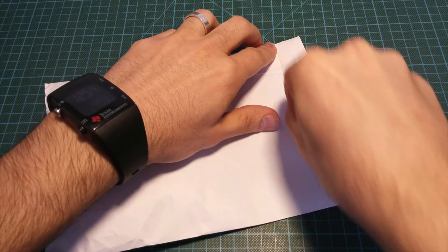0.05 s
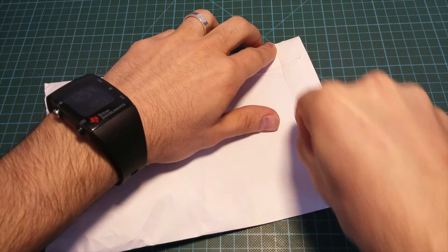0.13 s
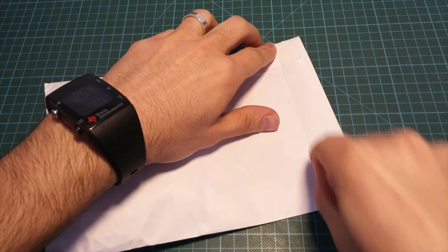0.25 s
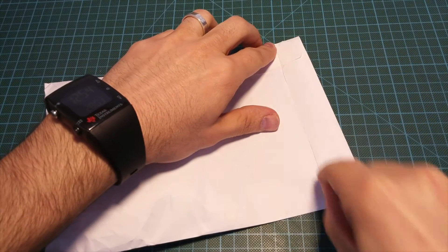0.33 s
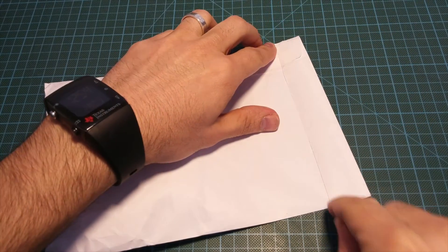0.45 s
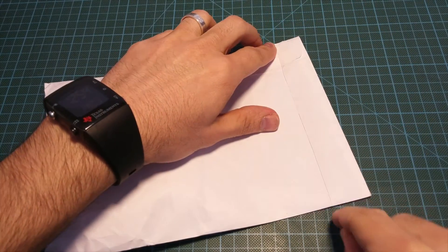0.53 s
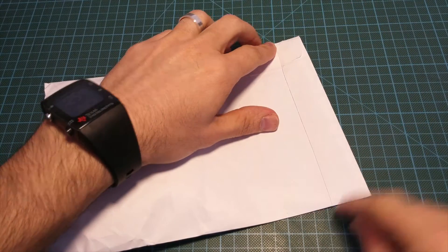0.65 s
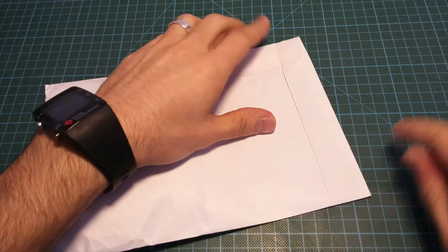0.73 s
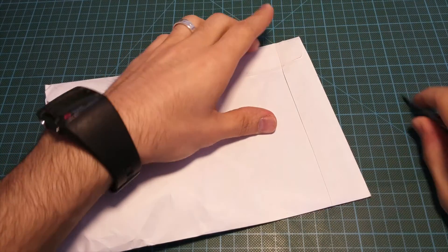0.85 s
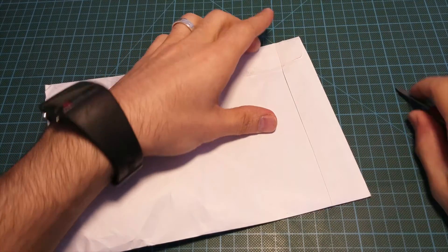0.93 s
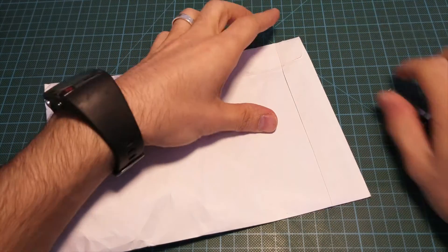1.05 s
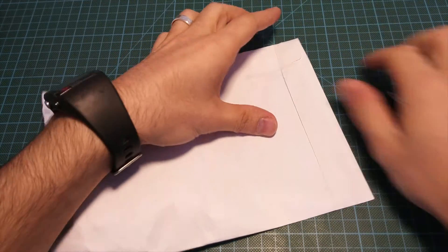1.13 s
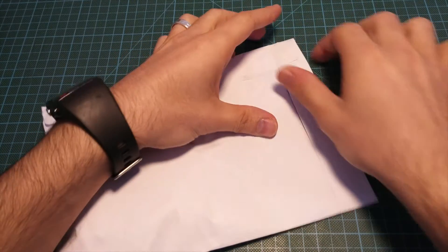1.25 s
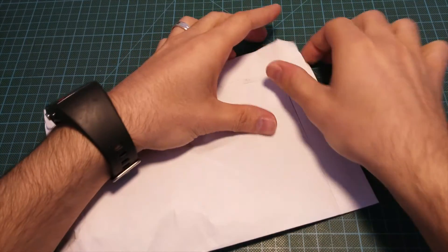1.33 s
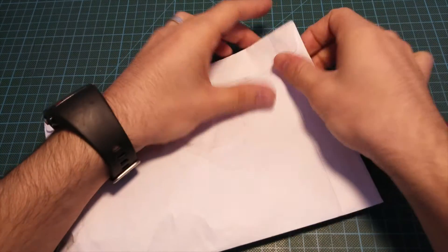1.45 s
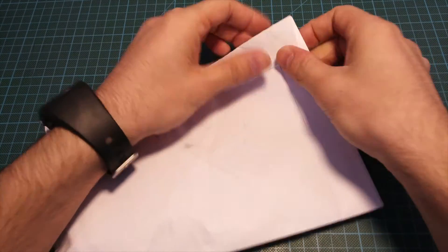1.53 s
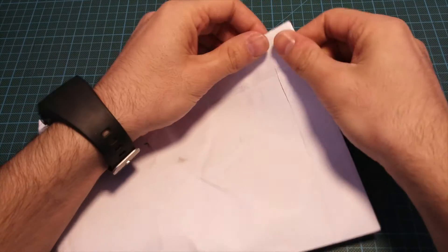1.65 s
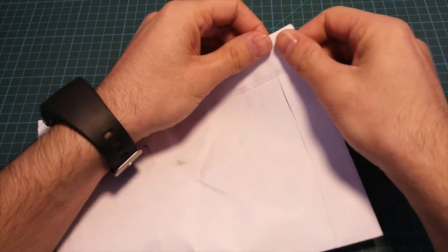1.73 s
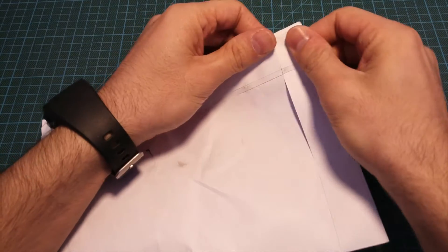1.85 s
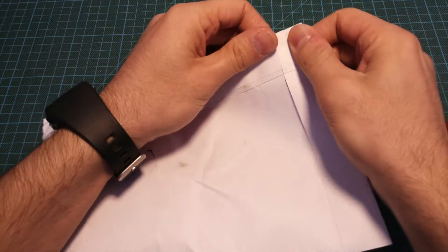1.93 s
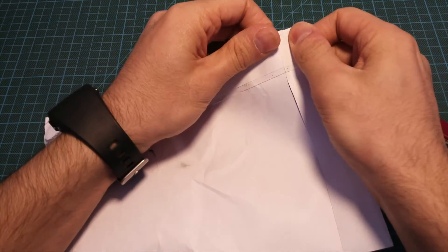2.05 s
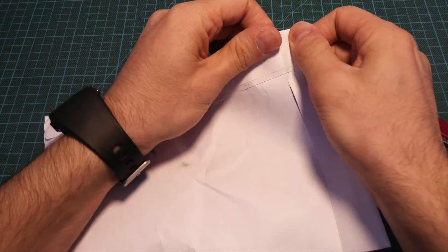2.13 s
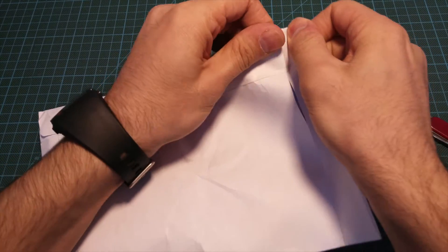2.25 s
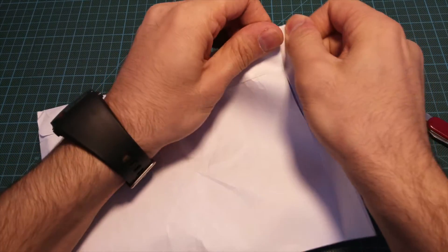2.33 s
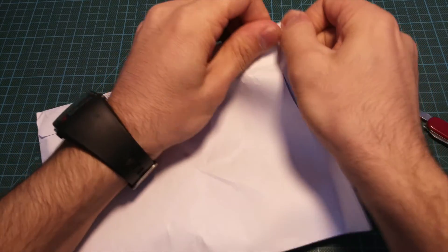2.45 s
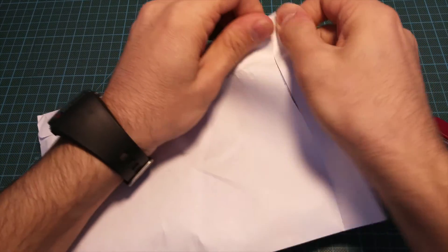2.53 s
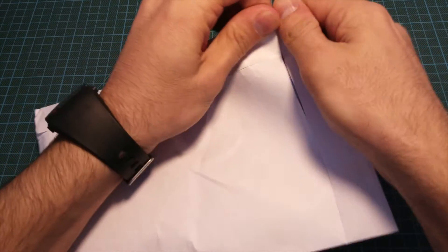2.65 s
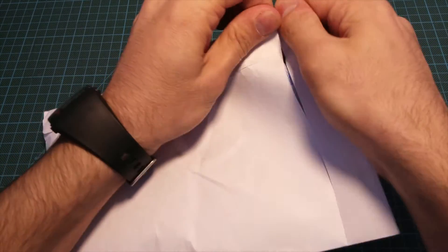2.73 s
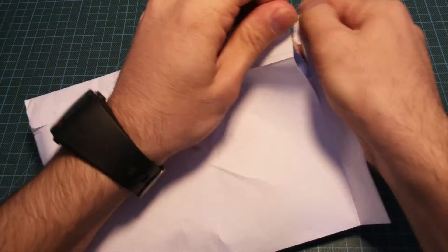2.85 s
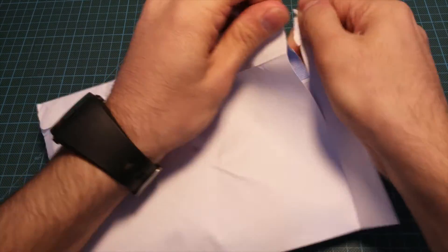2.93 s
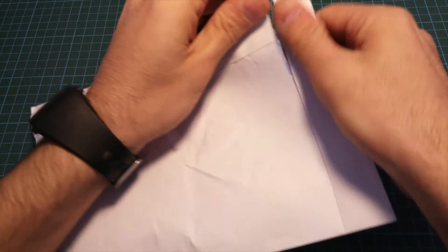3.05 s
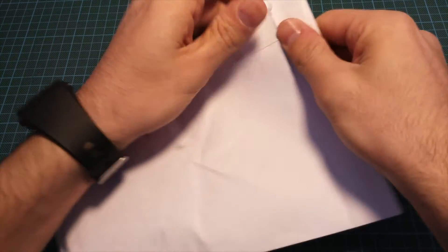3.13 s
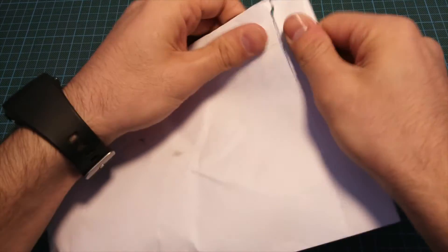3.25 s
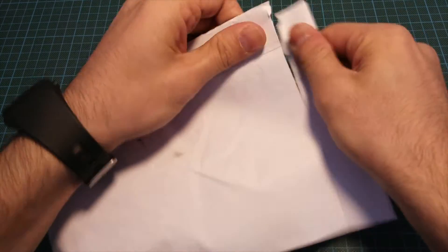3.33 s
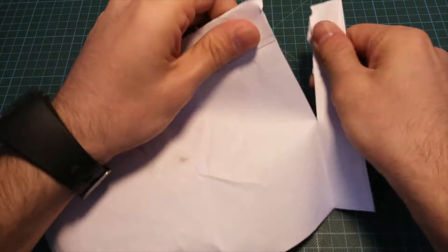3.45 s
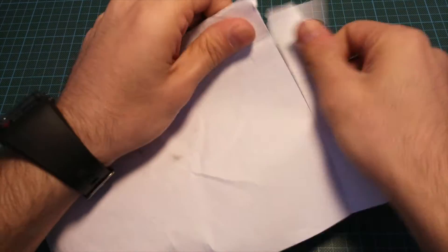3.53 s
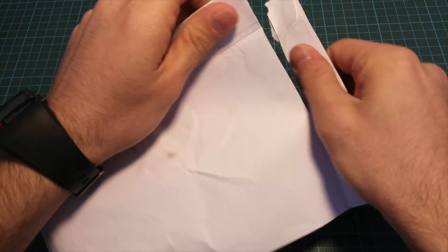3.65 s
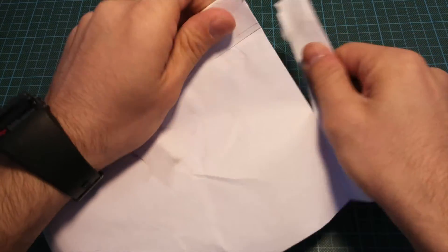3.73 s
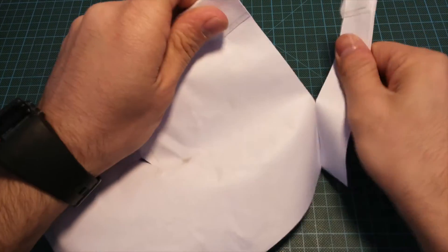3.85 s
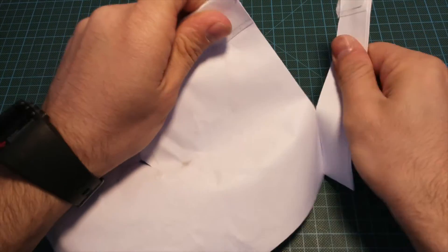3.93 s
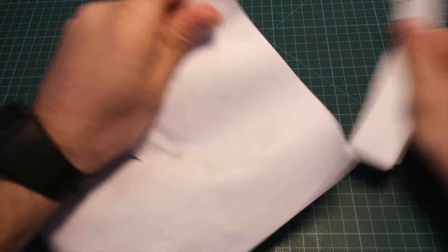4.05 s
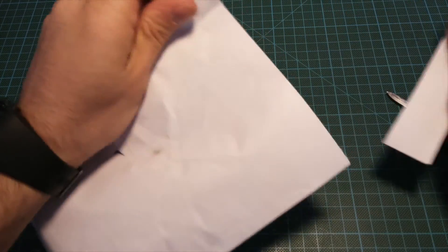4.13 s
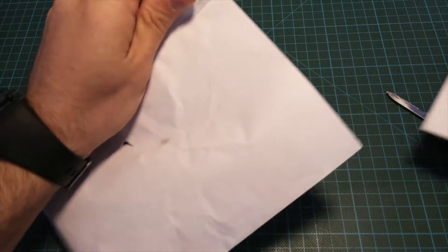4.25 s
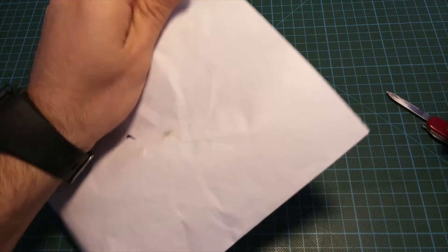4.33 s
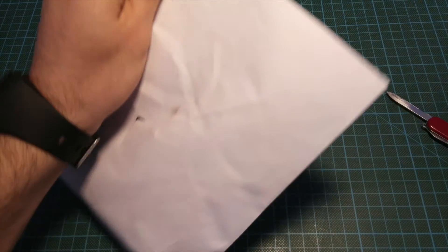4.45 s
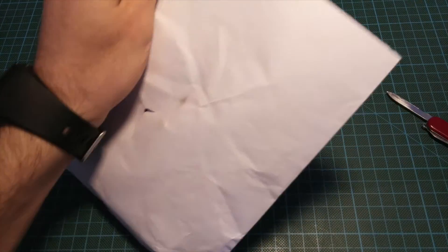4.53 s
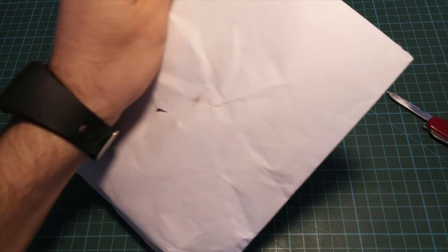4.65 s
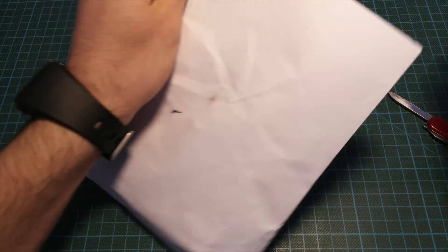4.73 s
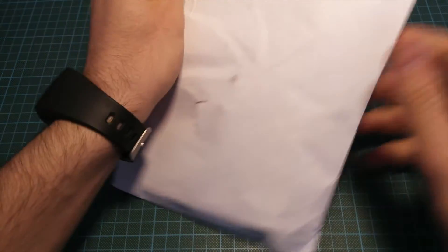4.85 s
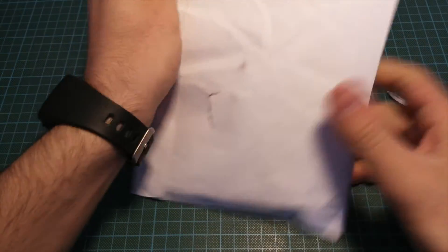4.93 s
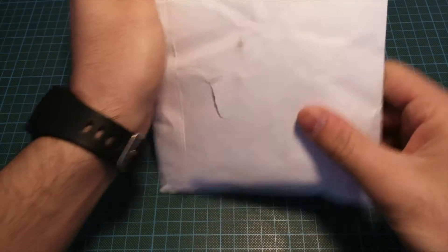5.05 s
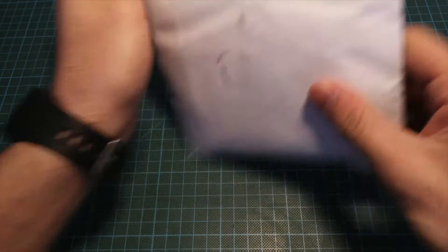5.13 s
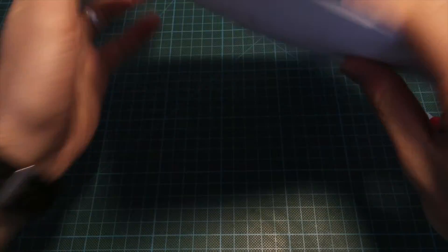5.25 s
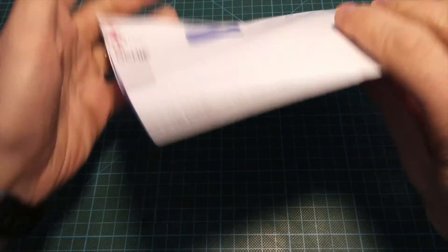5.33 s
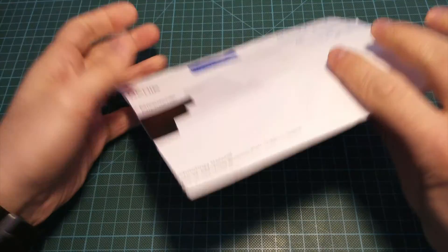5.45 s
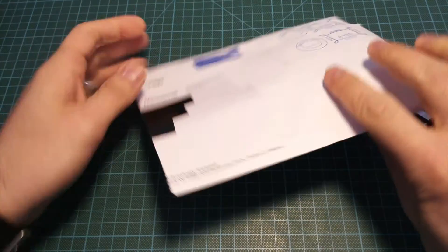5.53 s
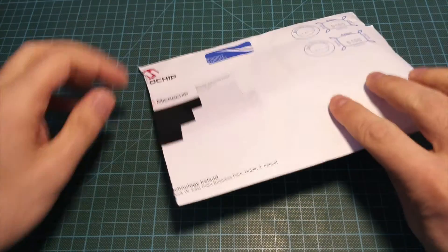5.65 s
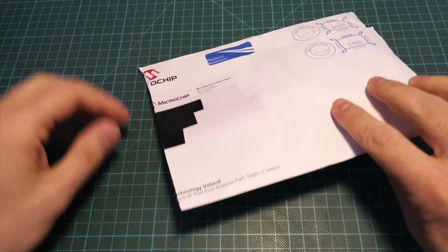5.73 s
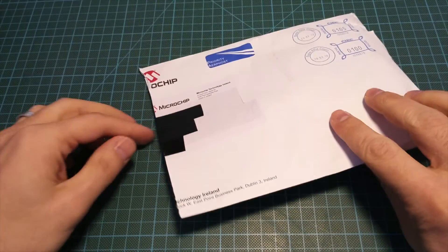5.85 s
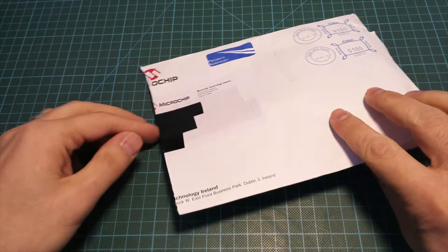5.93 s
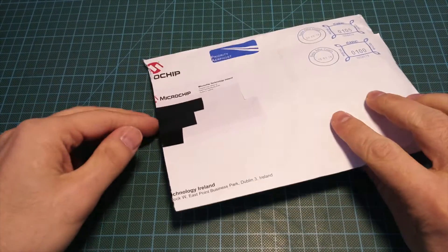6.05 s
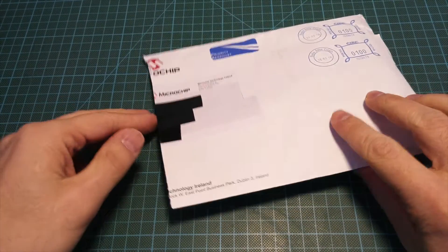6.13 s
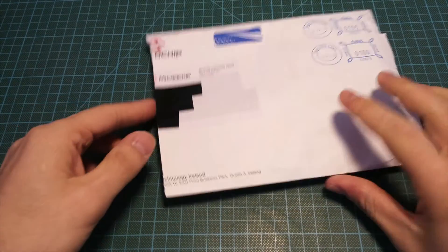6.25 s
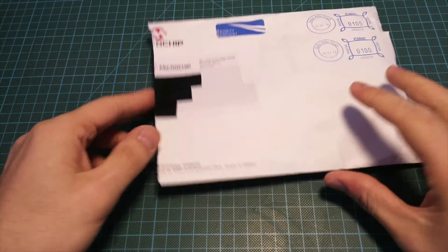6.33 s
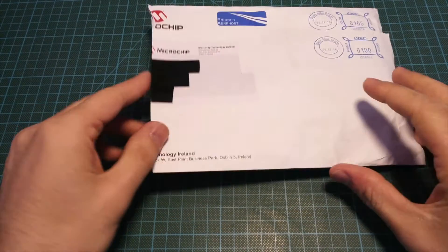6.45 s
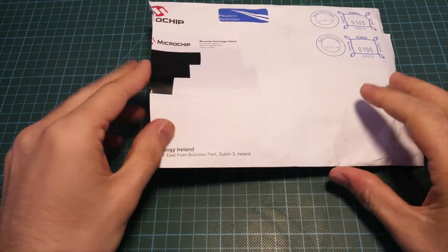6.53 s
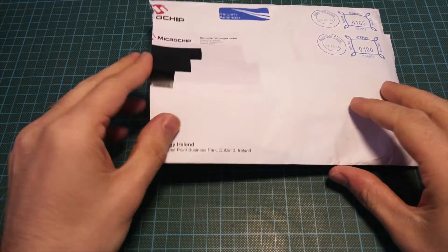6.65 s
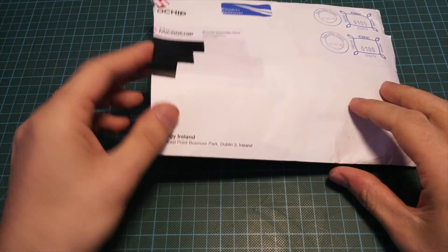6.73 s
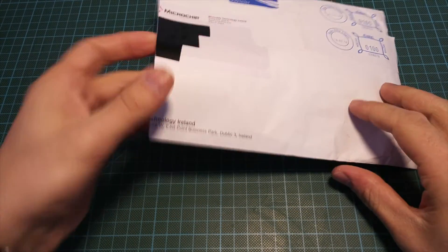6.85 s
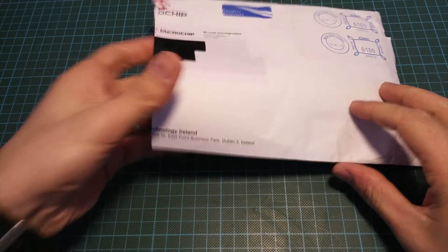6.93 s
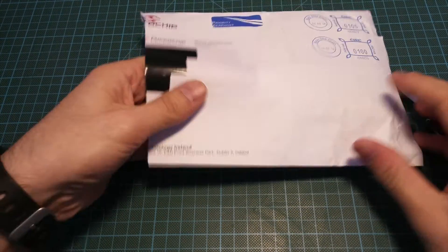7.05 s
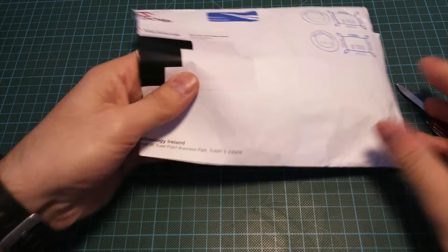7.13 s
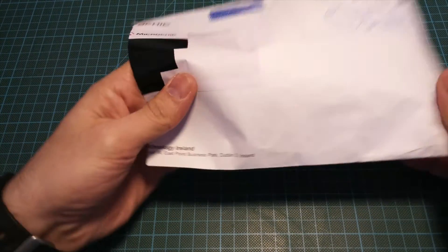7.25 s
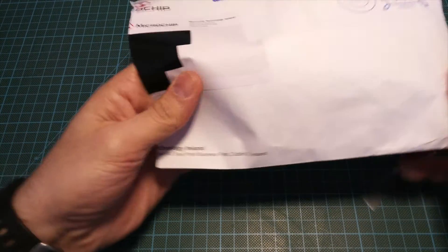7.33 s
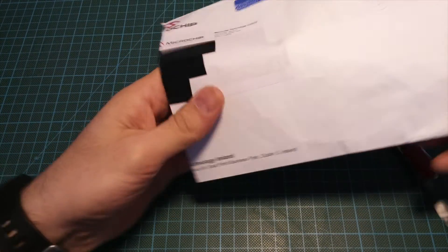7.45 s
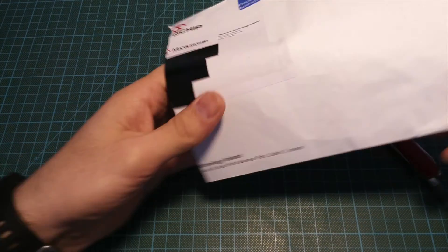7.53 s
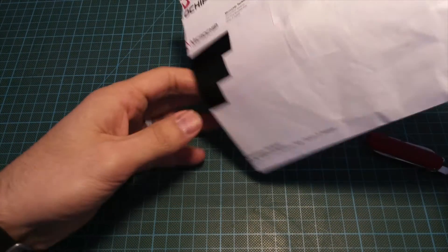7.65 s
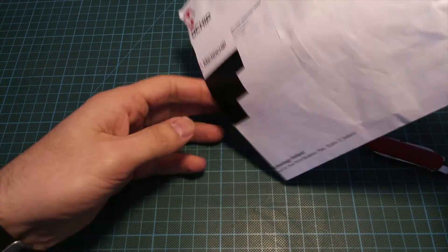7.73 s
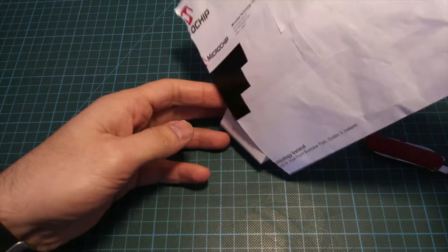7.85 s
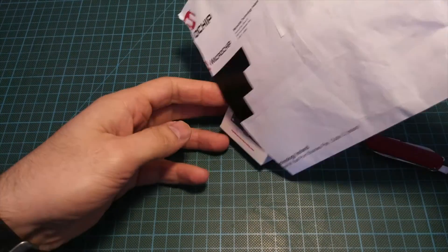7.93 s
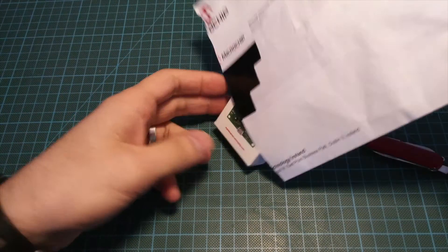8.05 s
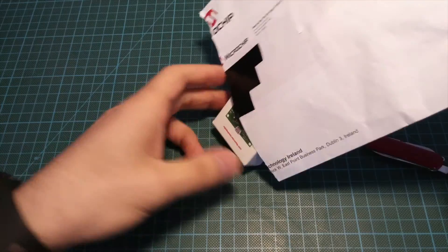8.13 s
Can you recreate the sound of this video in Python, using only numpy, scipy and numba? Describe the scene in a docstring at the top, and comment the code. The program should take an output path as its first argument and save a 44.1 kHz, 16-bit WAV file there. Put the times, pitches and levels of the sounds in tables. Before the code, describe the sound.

Light papery scuffs on a cutting mat give way to sharp irregular pops and crinkles, then a brief tear in several jerks, strongest about halfway through. The paper quietens, is flipped with airy swishes, rests, then rustles and buckles again as it is shaken until something small bumps the desk. Close stereo microphone indoors, faint steady room air.

```python
"""At a desk in a small room, two hands slide a paper envelope over a cutting mat, pinch a corner, tear one
end off in a run of pulls, then turn it over and shake out a small card. Rubbing and ripping are showers
of tiny random clicks; dry snaps are short noise bursts that ring a paper panel. The hollow envelope and
the desk ring a little, the room adds a short tail, and a stereo microphone listens from close above."""
import sys
import numpy as np
from scipy import signal
from scipy.fft import rfft, irfft
from scipy.io import wavfile
from scipy.ndimage import uniform_filter1d, map_coordinates
from numba import njit

SR = 44100
rng = np.random.default_rng(int(sys.argv[2]) if len(sys.argv) > 2 else 0)


def to_wav(s):
    """Save 16-bit WAV."""
    ch = np.atleast_2d(s).T  # columns
    pcm = np.round(np.clip(ch, -1, 1) * 32767)  # PCM
    wavfile.write(sys.argv[1], SR, pcm.astype(np.int16))


N = 361619
TIME = np.arange(N) / SR  # seconds

# Faint background air, tone: hz, level_db
AIR_COLOUR = [(20, -17.5), (60, -5), (130, 2), (300, -15.5), (1000, -3.5), (3000, -4.5), (7000, -19.5),
              (16000, -25)]

# Hands and the falling card bump the desk: start_s, strike_db
BUMPS = [(0.071, -57), (0.153, -58), (1.368, -50.5), (1.672, -48), (3.456, -42), (4.162, -34), (5.075, -47),
         (5.435, -51), (7.908, -32.5), (7.953, -37), (8.009, -43)]
# Ringing tones of the desk top: pitch_hz, level_db, t60_s (time to fade by 60 dB)
DESK_TONES = [(89.5, -41, .2), (125.5, 0, 0.42), (182, 5.5, 0.091), (234.2, -7, 0.54), (312, -20, 0.29),
              (366, -19, 0.23)]

# Room tail, tone: hz, level_db
ROOM_COLOUR = [(50, -22), (130, -7.5), (300, 10), (600, 3.5), (1100, 4.5), (2500, -2), (6000, -4.5),
               (16000, -6)]
ROOM_T60_S, ROOM_TREBLE_T60_S = 0.36, 0.27
ROOM_DB = -6.5  # on top of the room colour

# How much the two sides differ at each pitch: hz, level_db
SIDE_COLOUR = [(60, -11), (250, -13), (600, -11), (1100, -11), (2200, -2.5), (6000, 0), (16000, -8.5)]
# Where the paper sounds: time_s, left_lag_ms (negative means the left is earlier)
PLACE = [(.2, 0.11), (.75, -0.11), (1.25, -.1), (1.75, 0.043), (3.85, -0.0042), (5.2, 0.076), (5.7, -0.038),
         (6.3, -0.05), (6.7, -0.0079), (7.7, 0.018), (8.2, -0.079)]
# The left capsule faces the paper and hears more of its edge: hz, left_over_right_db
FACING = [(60, -1.1), (280, -1.3), (1000, -1), (2200, 2.2), (4000, 3.3), (8000, 2), (13000, 1.2)]
TOP_HZ = 16200  # highest pitch kept

# Steady ring of the envelope's stiff, filled middle: pitch_hz, width_hz, level_db
BODY_RINGS = [(1033, 25, -6.5), (1208, 13, -38.5)]
# Gliding paper whistles faintly in the open pocket: time_s, pitch_hz, openness (share, 0-1)
POCKET = [(3.9, 1180, 0.04), (4.35, 1266, 0.98), (4.7, 1230, 0.5), (5.0, 960, 0.4), (5.25, 1500, 0.4),
          (5.6, 1545, 0.5), (5.69, 1270, 0.46), (5.85, 1165, 0.04), (8.2, 1168, 0.28)]
# Pocket resonances: pitch_multiple (of the pocket pitch), level_db
POCKET_MODES = [(1, -40), (1.312, -11.5), (1.86, 2.5), (2.32, 2.5), (3.95, -13.5)]

# Flat sheets glide, bent ones catch: time_s, bend (share, 0-1)
GRIP = [(0, 0), (1.2, 0), (3.3, 0.93), (4.2, 1), (4.5, 0), (6.8, 1), (8.2, 0.84)]
# Paper slides on mat, skin and itself: start_s, length_s, level_db, bass_db, treble_db
# (levels before the small trims in friction() and rubbing(); bass and treble are relative to level)
SLIDES = [(-.03, 0.21, -45.5, 0, 5.5), (.17, 0.16, -48, -0.5, 5), (.33, 0.19, -56, 4, 0),
          (.6, 0.12, -68, 7, 8), (.95, 0.075, -53, -15, -3.5), (1.14, 0.11, -44, -5, -5),
          (1.33, 0.38, -47.5, -9.5, -6), (1.74, 0.047, -57, -15, 8.5), (1.83, 0.064, -56, -13, -2),
          (1.94, 0.1, -47, -10, -11), (2.1, 0.4, -60.5, -14, 1), (2.5, 0.063, -57, 1, -5),
          (2.6, .11, -47, -10, -2), (2.8, 0.048, -51, -10, -5), (2.95, 0.11, -43, -9, -2),
          (3.08, 0.044, -44, -6.5, 0), (3.22, 0.16, -49.5, -10, 0), (3.35, 0.25, -46.5, -3, -1.5),
          (3.71, 0.1, -44.5, -8, -4.5), (3.79, 0.16, -39.5, -27, -4.5), (4.07, 0.19, -41, -2.5, -3),
          (4.28, 0.38, -59, -21, 2.5), (4.68, 0.42, -59, -18, 4.5), (4.82, 0.29, -50, -12, 2.5),
          (5.18, 0.053, -46, -3, 2), (5.26, 0.055, -50, -11, 7), (5.39, 0.066, -46.5, 0.5, -4.5),
          (5.57, 0.12, -48, -7, -5), (5.612, 0.074, -39.5, -22, -4), (5.7, 0.062, -46.5, -6, -4.5),
          (5.85, .05, -57, -6, -14), (6.04, 0.024, -53.5, -22, -9), (6.28, .19, -55, -8, -1),
          (6.675, 0.069, -57, -24, -16), (6.82, 0.069, -57.5, 3, -23), (6.92, 0.09, -51, -10, -5),
          (6.97, .11, -36.5, -15, -3.5), (7.16, 0.087, -36, -8.5, -9), (7.33, 0.19, -46.5, -3, -4.5),
          (7.49, 0.18, -41, -2.5, -6), (7.75, 0.094, -42, -7, -7.5), (7.84, .06, -45, 1, 3.5),
          (7.94, 0.077, -43.5, 5.5, -9), (8.09, 0.086, -48, 3.5, -7.5)]
# The hands never lie quite still, resting level: level_db, bass_db, treble_db
TOUCH = (-64, 1, -1.3)
# Tone of the rubbing: hz, level_db
RUB_COLOUR = [(25, -36.5), (50, -17), (120, -4.5), (250, 0), (500, -0.5), (1000, 7), (1700, 4), (2800, -1),
              (4000, 0), (5500, -2), (7500, -7.5), (10000, -7.5), (13000, -13.5), (16000, -7.5)]
# A slide swells over a share of its length and dies away more slowly the longer it was
SLIDE_RISE_SHARE, SLIDE_FADE_S, SLIDE_FADE_SHARE = 0.24, 0.015, 0.31
# The mat echoes the sliding; the delay wanders as the paper moves
MAT_ECHO_MS, MAT_WANDER_MS, MAT_ECHO_DB = 1.7, 0.253, -10.5

# The first scuff and the pulls that run the rip: start_s, length_s, level_db, bass_db, treble_db
# (levels before the small trims in friction() and tearing())
PULLS = [(1.112, 0.028, -25.5, -5, -17), (2.91, 0.057, -27.5, -2, -2.5), (3.435, 0.046, -30.5, -4, -1),
         (3.86, 0.031, -25.5, -2, -6), (3.94, 0.035, -48.5, 15, 5), (4.125, 0.069, -23, -11.5, -2)]
# Tone of the tearing: hz, level_db
TEAR_COLOUR = [(25, -25.5), (50, -24), (130, 0.5), (300, 4), (600, -5.5), (1100, 1), (1700, -10),
               (2800, -10), (5000, -13), (7500, -20.5), (10000, -17.5), (12500, -28), (16000, -25)]
PULL_RISE_SHARE, PULL_FADE_S, PULL_FADE_SHARE = 0.31, 0.0062, 0.031

# The paper buckles or knocks: start_s, level_db (over 10 ms, before the body ring), pitch_hz (of the panel),
# decay_ms (time in which the push falls to 29 %), fizz_db (treble of breaking fibres)
SNAPS = [(.4466, -40.5, 960, 7.7, -30), (0.559, -51, 1360, 4.5, -3), (0.6129, -37, 616, 8.5, -20),
         (0.6476, -40.5, 2040, 5.6, -5.5), (0.7755, -40, 2070, 4, -21), (0.9651, -36, 2180, 3.6, -48),
         (1.093, -40, 1330, 6.2, -53), (1.11, -22, 1090, 4, -16.5), (1.1249, -21, 1250, 3.5, -29),
         (1.1571, -30, 1390, 4.2, -28), (1.2073, -38, 1630, 5, -4), (1.3225, -28, 1430, 4.3, -45),
         (1.3674, -33.5, 843, 14.4, -21), (1.418, -26, 2070, 4.6, -26), (1.4414, -34.5, 1930, 9.5, -31),
         (1.4722, -33.5, 1240, 6, -46), (1.5448, -31, 2100, 6.3, -29), (1.5636, -18.5, 1940, 4.6, -27.5),
         (1.5923, -30, 1460, 6.2, -49), (1.6299, -32, 1410, 6.4, -46), (1.672, -32.5, 1020, 14, -32),
         (1.7465, -46, 1800, 10, 1), (1.78, -40, 1990, 2.8, 4), (1.9602, -22, 1360, 6.7, -39),
         (1.988, -31, 1280, 4.7, -41), (2.1263, -45, 1200, 6.7, -5.5), (2.1532, -38, 1730, 4.6, -51),
         (2.2017, -32.5, 1800, 4.6, -33), (2.2347, -23, 1200, 2, -43), (2.2625, -40.5, 1300, 4.8, -6),
         (2.2825, -37, 1380, 2.8, -2), (2.3463, -30, 1250, 4.8, -51), (2.426, -46.5, 1800, 6.4, -12),
         (2.4995, -46, 2150, 1.8, -5), (2.518, -32, 1620, 7.3, -39), (2.5552, -43, 1090, 8.3, -26),
         (2.5988, -44, 1670, 6.4, -14), (2.6453, -37.5, 2100, 2.2, -7), (2.677, -34, 1020, 24, -21),
         (2.7956, -40.5, 910, 4, -28), (2.8449, -39, 1400, 25, -15), (2.8887, -25, 1470, 19.5, -8),
         (2.907, -29, 1280, 8.7, -9), (2.943, -23, 1260, 4.4, -26), (2.956, -12.5, 1450, 1.8, -50),
         (3.024, -36.5, 1360, 10, -39), (3.061, -31, 1040, 6.1, -61), (3.2055, -34.5, 1760, 5, -25),
         (3.4005, -35.5, 1470, 5.5, -38), (3.424, -27, 1150, 3.6, -16), (3.4338, -22, 1080, 4.9, -53),
         (3.4533, -16.5, 1430, 5.8, -28), (3.4568, -19, 1280, 6.4, -31), (3.4715, -27, 1750, 3.8, -21),
         (3.496, -21, 1940, 7.3, -36), (3.5415, -31, 1040, 15, -38), (3.562, -29.5, 1300, 7, -32),
         (3.636, -33.5, 1360, 11, -22), (3.81, -29, 1730, 5, -25), (3.8268, -29.5, 1300, 2.2, -45),
         (3.872, -18.5, 1550, 2.3, -22), (3.8852, -16.5, 1470, 4.7, -26.5), (3.9296, -30, 1570, 1.5, 10),
         (3.9414, -24, 2080, 5.2, -12.5), (3.9647, -29, 1000, 7.3, -40), (4.0335, -39, 920, 6.7, -43),
         (4.097, -23.5, 920, 6, -19), (4.115, -25.5, 920, 6, -5), (4.124, -18, 1170, 3.1, -24),
         (4.1312, -21, 1230, 9.9, -5), (4.1479, -20, 1020, 5.4, -21), (4.1602, -23, 1140, 6, -13),
         (4.171, -26, 1300, 4.6, 0), (4.1917, -19.5, 1440, 15.5, -34), (4.2349, -25, 1180, 9.5, -44),
         (4.5415, -47, 900, 13, -29), (4.5752, -42.5, 830, 6.6, -47), (4.832, -45.5, 1090, 5.8, -30),
         (4.931, -33.5, 1920, 5.5, -27), (5.0412, -32, 800, 10, -43), (5.0758, -34.5, 1100, 5, -29),
         (5.1317, -35.5, 890, 16, -44), (5.1994, -35.5, 1040, 5, -39), (5.2071, -29, 1140, 4.5, -36),
         (5.334, -44.5, 990, 5.5, -36), (5.4145, -35.5, 1360, 5.2, -30), (5.435, -39.5, 820, 24, -29),
         (5.4802, -37.5, 1590, 16, -37), (5.5227, -46, 1050, 5.6, -38), (5.5581, -43.5, 830, 4.6, -60),
         (5.956, -40, 1380, 3.2, -37), (6.1787, -51, 769, 5.5, -45), (6.3617, -49, 930, 4.5, -36),
         (6.6908, -28, 1440, 6.5, -50), (7.0126, -24, 1520, 6.2, -33), (7.075, -22, 1070, 3, -28),
         (7.079, -29, 1550, 5.3, -22), (7.1658, -35, 950, 8.2, -35), (7.1853, -35, 1230, 6, -55),
         (7.1927, -27.5, 1100, 4.2, -78), (7.2153, -26, 1050, 2.5, -60), (7.254, -27.5, 930, 6.1, -59),
         (7.2708, -34, 1090, 7.6, -53), (7.3072, -30, 1016, 12, -54), (7.3459, -21.5, 1020, 5.4, -42),
         (7.387, -34.5, 1650, 12, -34), (7.455, -36.5, 810, 4.5, -61), (7.5009, -29.5, 2200, 6, -16.5),
         (7.508, -28, 980, 12, -31), (7.6225, -30.5, 775, 2.1, -74), (7.6371, -29, 880, 4.6, -63),
         (7.6639, -27, 1200, 9.8, -47), (7.7136, -32, 1500, 11, -39), (7.804, -35, 1630, 8.6, -41),
         (7.838, -28.5, 1340, 7.2, -39), (7.9046, -15.5, 960, 3, -36), (7.9083, -25.5, 840, 14, -30),
         (7.996, -29.5, 1550, 8.6, -38), (8.0073, -28, 1110, 5, -44), (8.092, -32.5, 2120, 4.5, -25.5),
         (8.1009, -31.5, 940, 8.4, -48), (8.1186, -37.5, 1496, 8, -46)]
# A typical snap; the others follow from it by the laws in snap_tone()
SNAP_HZ, SNAP_MS, SNAP_FIZZ_DB, SNAP_THUD_DB, SNAP_EDGE_DB = 1300, 5.72, -32, -9, -17
THUD_DB_PER_DOUBLING, THUD_PER_FIZZ = 4.5, 0.194
EDGE_DB_PER_OCTAVE, EDGE_PER_FIZZ = 7.5, 0.3
# Small creases: level against the rubbing, gain when fully bent, range of sizes
CREASE_DB, CREASE_BEND_DB, CREASE_RANGE_DB = -14.5, 12, 11


def undb(db):
    """Turn decibels into a plain multiplier."""
    return 10 ** (np.asarray(db) / 20)


def curve(rows):
    """Every column of a table after the time, joined by straight lines."""
    s, *columns = np.transpose(rows)
    return [np.interp(TIME, s, c) for c in columns]


def unit(x):
    """Scale a sound to an average (RMS) level of 1."""
    return x / np.sqrt(np.mean(x ** 2))


def response(points, size=2048):
    """A filter with the given (hz, level_db) tone that never sounds before its input."""
    hz, db = np.transpose(points)
    f = np.maximum(np.fft.rfftfreq(size, 1 / SR), 1)
    log_gain = np.log(undb(np.interp(np.log(f), np.log(hz), db)))
    # folding the cepstrum forward in time gives the minimum-phase filter
    cepstrum = irfft(log_gain)
    cepstrum[1:size // 2] *= 2
    cepstrum[size // 2 + 1:] = 0
    return irfft(np.exp(rfft(cepstrum)))


def colour(x, points):
    """Give every channel a (hz, level_db) tone."""
    return signal.oaconvolve(x, response(points)[None], axes=-1)[:, :x.shape[-1]]


def spread(pair):
    """Two unrelated signals as middle and side: a wide sheet sends different treble each way."""
    side = colour(pair[1:], SIDE_COLOUR)[0]
    return np.array([pair[0] + side, pair[0] - side])


def delayed(x, ms):
    """One channel heard later by a moving time."""
    return map_coordinates(x, [np.arange(N) - ms * SR / 1000], order=3)


def flutter(per_s):
    """Random levels joined by straight lines, scaled to RMS 1."""
    step = int(SR / per_s)
    stairs = np.repeat(rng.standard_normal(N // step + 1), step)[:N]
    return unit(uniform_filter1d(stairs, step))


def strokes(rows, rise_share, fade_s, fade_share, rest):
    """Hand movements that rise, hold and fade over a resting level; gives level, bass and treble in dB."""
    t = TIME[::32]  # hands move slowly, so a coarse clock will do

    def bands(db, bass, treble):
        """Power of the middle, bass and treble."""
        return undb(db + np.array([[0], [bass], [treble]])) ** 2

    power = bands(*rest) * np.ones(len(t))
    for start, length, *tone_db in rows:
        rise = np.clip((t - start) / (rise_share * length), 0, 1)
        fade = np.exp(-np.maximum(t - start - length, 0) / (fade_s + fade_share * length))
        power = power + bands(*tone_db) * (rise * fade) ** 2
    level, bass, treble = (np.interp(TIME, t, 10 * np.log10(p)) for p in power)
    return level, bass - level, treble - level


def slips(size, per_s, spread_db):
    """Tiny clicks at random times, most small and a few large."""
    sizes = undb(spread_db * np.minimum(rng.exponential(size=size), 5))
    happens = rng.random(size) < per_s / SR
    return rng.standard_normal((2, size)) * sizes * happens


def friction(clicks, points, controls, treble_db, bass_db):
    """Clicks drive the sheet; pressure brings out its bass and speed its treble."""
    level, bass, treble = controls
    # even out the clicks first, so that the controls alone set the slow level
    power = uniform_filter1d(np.mean(clicks ** 2, axis=0), size=2400)
    clicks = clicks / np.sqrt(power + 1e-9)
    sheet = colour(spread(clicks), points)
    # split into bass below 400 Hz, middle, and treble above 2800 Hz
    low, dull = (signal.sosfiltfilt(signal.butter(3, hz, fs=SR, output="sos"), sheet) for hz in (400, 2800))
    bass_part = unit(low) * undb(bass + bass_db)
    middle_part = unit(dull - low)
    treble_part = unit(sheet - dull) * undb(treble + treble_db)
    return (bass_part + middle_part + treble_part) * undb(level - 0.78)


def background_air():
    """Steady soft noise, given the tone of the air and set to -66 dB."""
    noise = spread(rng.standard_normal((2, N)))
    return unit(colour(noise, AIR_COLOUR)) * undb(-66)


def desk():
    """Soft bumps set the desk top booming: each one starts a set of fading tones."""
    t = TIME[:SR]
    tones = sum(undb(db - 60 * t / t60) * np.sin(2 * np.pi * hz * t) for hz, db, t60 in DESK_TONES)
    ring = tones * (1 - np.exp(-t / 0.0018))  # soft start
    blows = np.zeros(N)
    for s, db in BUMPS:
        blows[int(s * SR)] = undb(db)
    return signal.oaconvolve(blows, ring)[:N]


def room(x):
    """A short diffuse tail, its treble dying first and its bass alike in both ears."""
    t = TIME[:SR * 2 // 3]
    noise = rng.standard_normal((2, len(t)))
    low = signal.sosfilt(signal.butter(2, 2500, fs=SR, output="sos"), noise)
    high = signal.sosfilt(signal.butter(2, 2500, "high", fs=SR, output="sos"), noise[::-1])
    tail = low * undb(-60 * t / ROOM_T60_S) + high * undb(-60 * t / ROOM_TREBLE_T60_S)
    tail = tail * np.clip((t - .003) / .006, 0, 1)  # starts after 3 ms
    side = colour(tail[1:], [(100, -41.0), (500, -5.0), (1200, -1.5), (2500, 12.0)])[0]
    tail = np.array([tail[0] + side, tail[0] - side])
    tail = colour(tail / np.sqrt(np.sum(tail ** 2) / 2), ROOM_COLOUR)
    return undb(ROOM_DB) * signal.oaconvolve(x, tail, axes=-1)[:, :N]


def microphone(x):
    """Each capsule has its own colour, and the left one hears the paper a little earlier or later."""
    # each capsule takes half of the difference
    left, right = (colour(channel[None], [(hz, sign * db / 2) for hz, db in FACING])[0]
                   for channel, sign in zip(x, (1, -1)))
    return np.array([delayed(left, curve(PLACE)[0]), right])


def body(x):
    """The whole envelope rings faintly along with every paper sound, through narrow resonances."""
    ring = sum(undb(db) * signal.lfilter(*signal.iirpeak(hz, hz / width, fs=SR), x)
               for hz, width, db in BODY_RINGS)
    return x + ring


@njit
def resonance(x, hz, q):
    """A resonance (state-variable band-pass) with a moving pitch, gain 1 there."""
    y, band, low = np.empty(len(x)), 0., 0.
    for i in range(len(x)):
        g = np.tan(np.pi * hz[i] / SR)
        v = (band + g * (x[i] - low)) / (1 + g * (g + 1 / q))
        band, low, y[i] = 2 * v - band, low + 2 * g * v, v / q
    return y


def pocket(pair):
    """The envelope's resonances drift as it is bent and turned, and colour the hiss."""
    hz, openness = curve(POCKET)
    ring = [sum(undb(db) * resonance(x, k * hz, 15.) for k, db in POCKET_MODES) for x in pair]
    return pair + 2.3 * openness * np.array(ring)


def sliding():
    """How hard the paper is rubbed at each moment: level, bass and treble in dB."""
    return strokes(SLIDES, SLIDE_RISE_SHARE, SLIDE_FADE_S, SLIDE_FADE_SHARE, TOUCH)


def rubbing():
    """Dense stick and slip of sliding paper, fluttering as the contact shifts, combed by its echo off the mat."""
    clicks = pocket(slips(N, per_s=9000, spread_db=1.0 + 1.8 * curve(GRIP)[0]))
    wobble = flutter(75)
    echo_ms = MAT_ECHO_MS + MAT_WANDER_MS * flutter(5)
    echo = np.array([delayed(c, echo_ms) for c in clicks])
    clicks = clicks + undb(MAT_ECHO_DB) * echo
    rub = friction(clicks, RUB_COLOUR, sliding(), treble_db=-0.6, bass_db=-2.5)
    return rub * undb(-0.7 + 1.24 * wobble)


def snap_tone(hz, decay_ms, fizz_db):
    """Thud and edge in dB: slow buckles thud more, small panels and breaking fibres sharpen the edge."""
    breaking = fizz_db - SNAP_FIZZ_DB
    doublings = np.log2(max(decay_ms, 1) / SNAP_MS)
    octaves = np.log2(hz / SNAP_HZ)
    thud_db = SNAP_THUD_DB + THUD_DB_PER_DOUBLING * doublings + THUD_PER_FIZZ * breaking
    edge_db = SNAP_EDGE_DB + EDGE_DB_PER_OCTAVE * octaves + EDGE_PER_FIZZ * breaking
    return thud_db, edge_db


def snap(hz, thud_db, edge_db, fizz_db, decay_ms, size=3072):
    """A panel pops through and rings for a few cycles, while smaller creases and fibres give way."""
    ms = 1000 * np.arange(size) / SR
    decay_ms = max(decay_ms, .5)
    rise_ms = decay_ms / 7  # a slow buckle also starts softly
    burst = np.exp(-1.25 * ms / decay_ms) * (1 - np.exp(-ms / rise_ms))
    flex, fibres = (slips(size, per_s=11000, spread_db=2.0) * burst for _ in range(2))
    flex, fibres = (p / np.sqrt(np.sum(p ** 2, axis=1, keepdims=True)) for p in (flex, fibres))
    # the shorter the snap, the more of it is one single pop
    pop = (3.2 / decay_ms) ** 1.6
    flex[:, np.searchsorted(ms, rise_ms / 2)] += pop * np.array([1, rng.uniform(-.8, .8)])
    # flexing drives the lows, breaking fibres the highs
    low, high = (signal.butter(2, 3500, kind, fs=SR) for kind in ("low", "high"))
    push = signal.lfilter(*low, flex) - signal.lfilter(*high, fibres) * np.hypot(1, pop)
    hz = np.clip(hz, 600, 2300)
    # every panel has its own size, so its bending modes lie differently
    modes = hz * np.array([.62, 1, 1.5, 2.6, 4.4]) * np.exp(.12 * rng.standard_normal(5))
    push = 1.6 * push + sum(signal.lfilter(*signal.iirpeak(f, 8, fs=SR), push) for f in modes)
    # tone of the panel: thud at the bottom, edge near 4 kHz, fizz at the top
    panel = [(40, thud_db - 45.5), (130, thud_db - .5), (225, thud_db + 3),
             (hz * 0.52, thud_db / 2), (hz * 0.796, -.7), (hz, -.3), (hz * 1.456, edge_db / 3 - 1.5),
             (4000, edge_db), (6000, (edge_db + fizz_db) / 2 + 1.5),
             (9500, fizz_db + 0.5), (12500, fizz_db + 0.12), (16000, fizz_db)]
    sound = colour(spread(push), panel)
    return sound / np.sqrt(np.sum(sound ** 2) / 2 / (SR / 100))  # level 1 over 10 ms


def creases(count=260):
    """Small dull snaps at random, louder the harder the paper is rubbed and bent; rows as in SNAPS."""
    when, size, pitch, fizz, length = rng.random((count, 5)).T
    at = (when * (N - 1)).astype(int)
    rub_db, bend = sliding()[0][at], curve(GRIP)[0][at]
    db = rub_db + CREASE_DB + CREASE_BEND_DB * bend + CREASE_RANGE_DB * size ** 2
    pitch_hz = 700 * 2 ** (1.5 * pitch)
    decay_ms = 2.6 + 4.6 * length
    fizz_db = -46 + 26 * fizz ** 2
    return np.transpose([at / SR, db, pitch_hz, decay_ms, fizz_db])


def crinkles():
    """All the snaps and small creases, each at its moment."""
    out = np.zeros((2, N + SR))
    for s, db, hz, decay_ms, fizz_db in [*SNAPS, *creases()]:
        thud_db, edge_db = snap_tone(hz, decay_ms, fizz_db)
        sound = snap(hz, thud_db, edge_db, fizz_db, decay_ms)
        start = int(s * SR)
        out[:, start:start + sound.shape[1]] += undb(db) * sound
    return out[:, :N]


def tearing():
    """While a pull lasts the rip runs in spurts of a few milliseconds, each a shower of breaking fibres."""
    silent = (-120, 0, 0)
    pulling = strokes(PULLS, PULL_RISE_SHARE, PULL_FADE_S, PULL_FADE_SHARE, silent)
    spurts = undb(2.6 * flutter(330))
    fibres = slips(N, per_s=3000, spread_db=1.0) * spurts
    return friction(fibres, TEAR_COLOUR, pulling, treble_db=0.0, bass_db=-11.0) * undb(0.16)


def scene():
    """The paper heard directly and through the room, over the desk and the faint air."""
    paper = body(rubbing() + tearing() + crinkles())
    return microphone(paper) + desk() + room(paper) + background_air()


def record(dry):
    """Peaks beyond full scale are clipped, then everything above TOP_HZ is cut steeply."""
    top_cut = signal.ellip(10, .2, 80, TOP_HZ, fs=SR, output="sos")
    return signal.sosfilt(top_cut, np.clip(dry, -1, 1))


dry = scene()
out = record(dry)
to_wav(out)
```